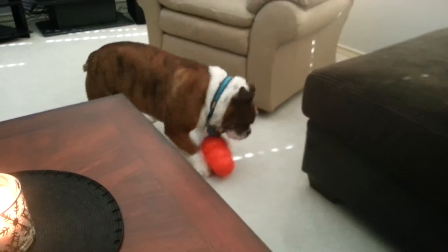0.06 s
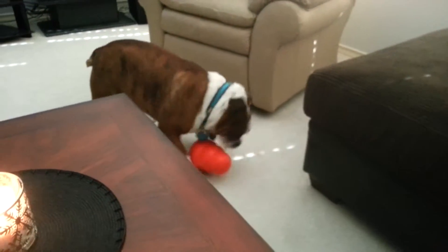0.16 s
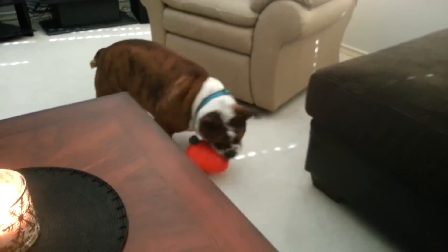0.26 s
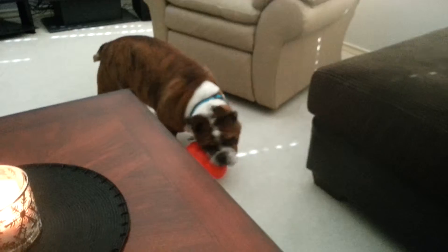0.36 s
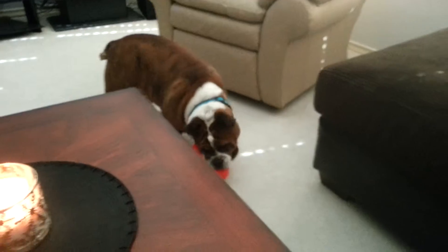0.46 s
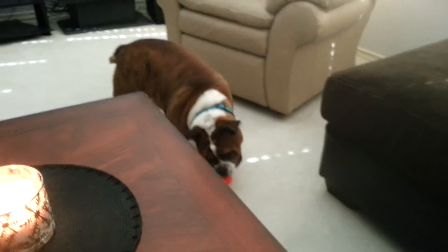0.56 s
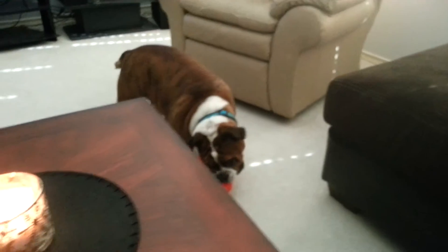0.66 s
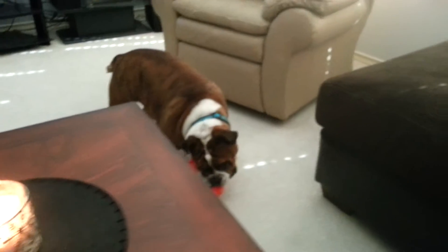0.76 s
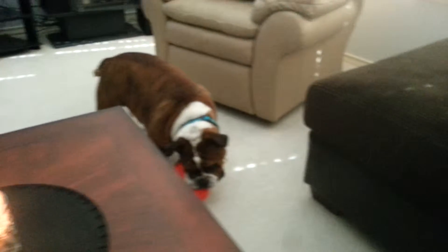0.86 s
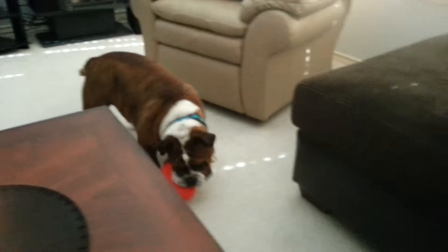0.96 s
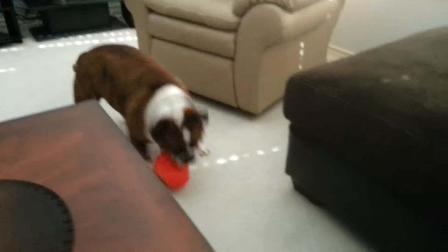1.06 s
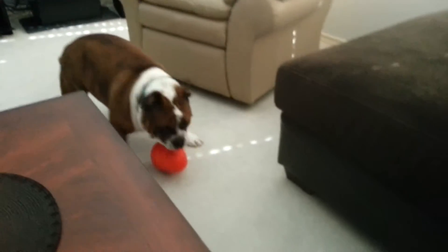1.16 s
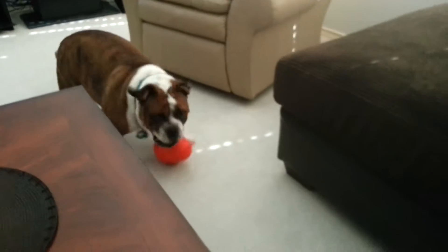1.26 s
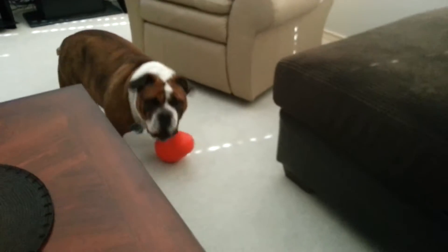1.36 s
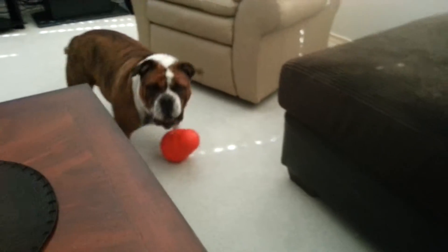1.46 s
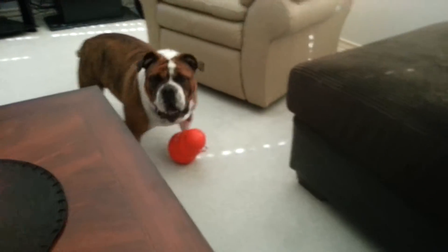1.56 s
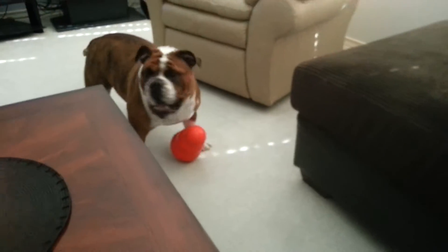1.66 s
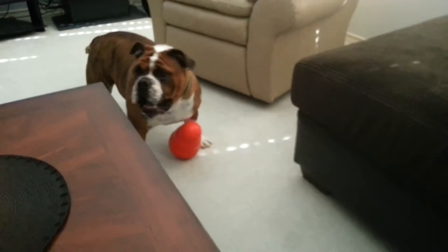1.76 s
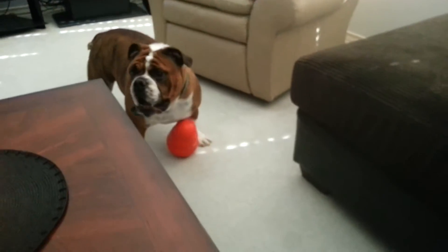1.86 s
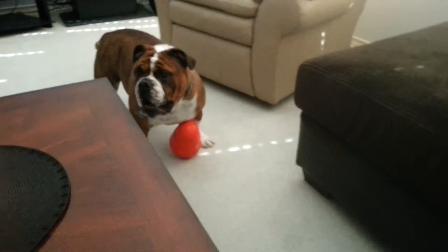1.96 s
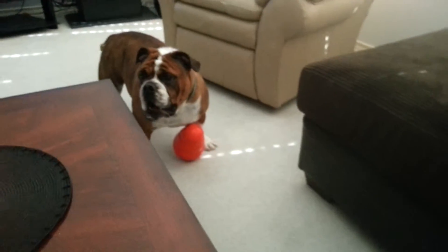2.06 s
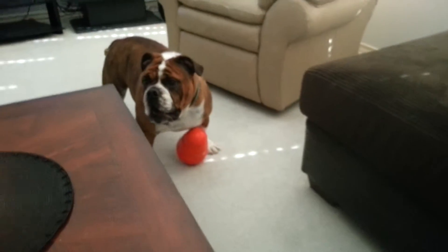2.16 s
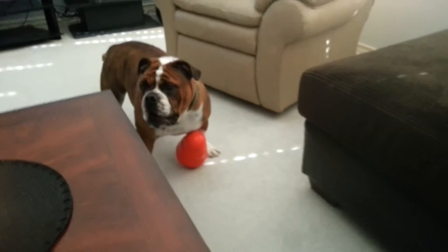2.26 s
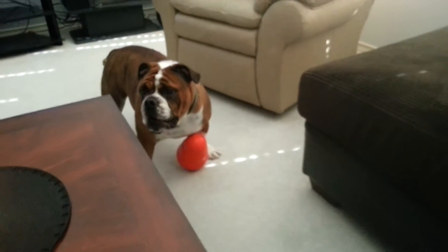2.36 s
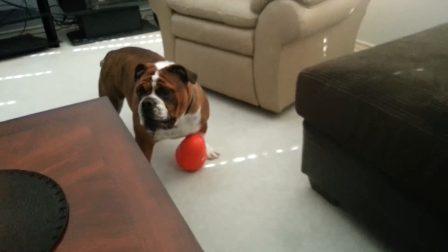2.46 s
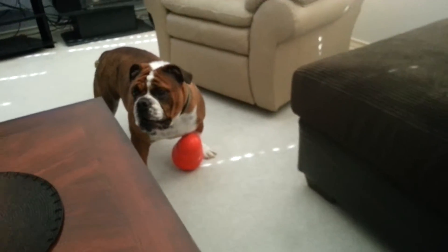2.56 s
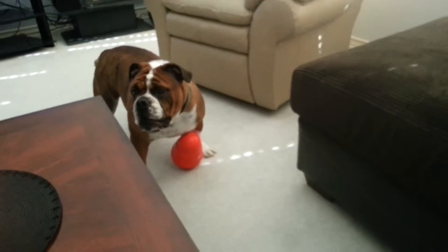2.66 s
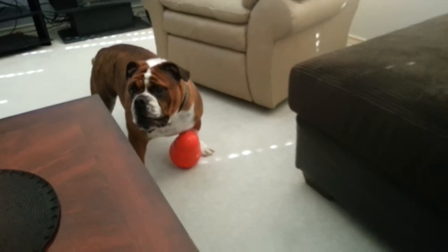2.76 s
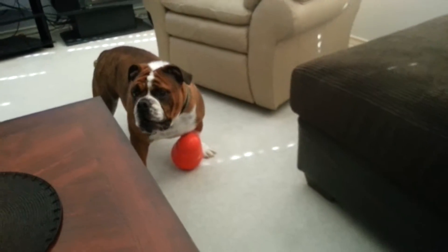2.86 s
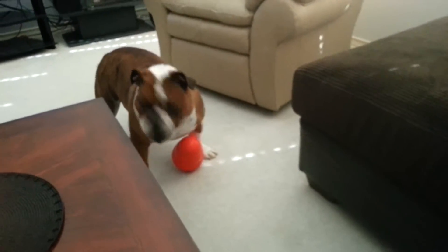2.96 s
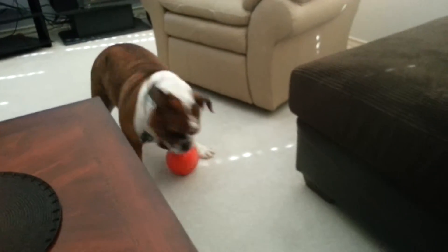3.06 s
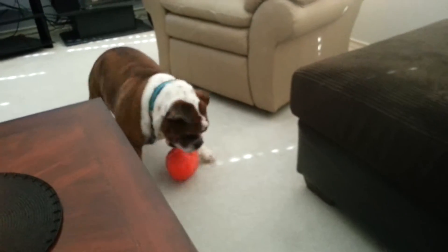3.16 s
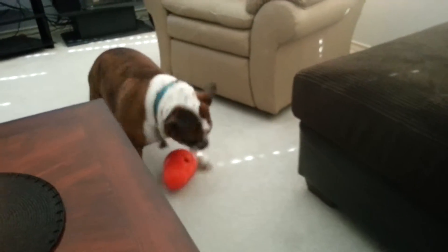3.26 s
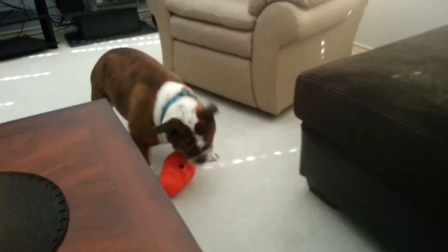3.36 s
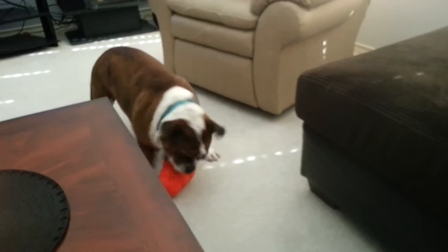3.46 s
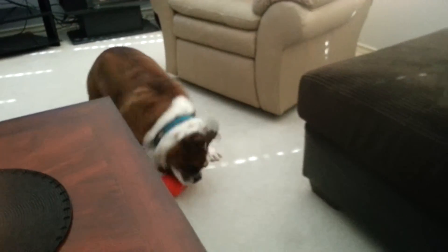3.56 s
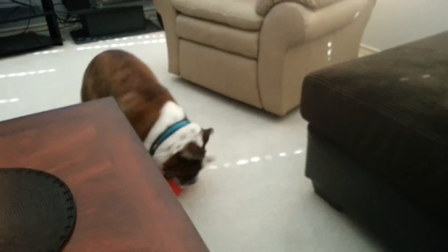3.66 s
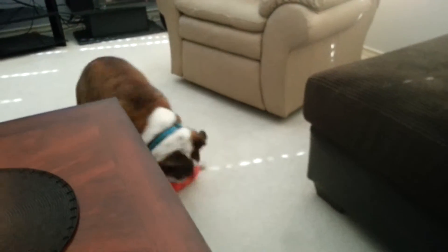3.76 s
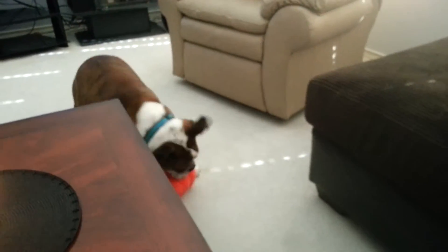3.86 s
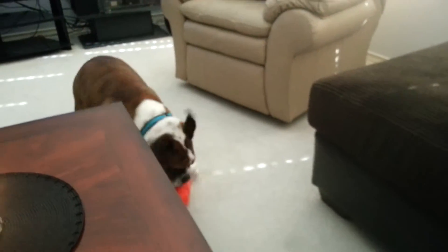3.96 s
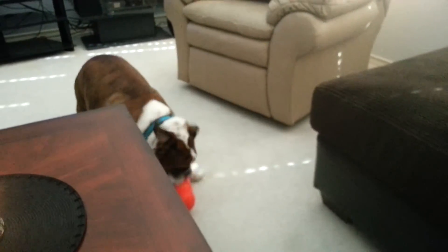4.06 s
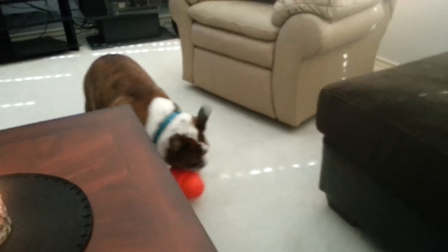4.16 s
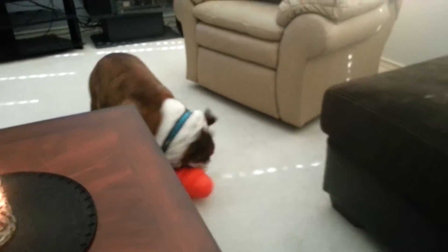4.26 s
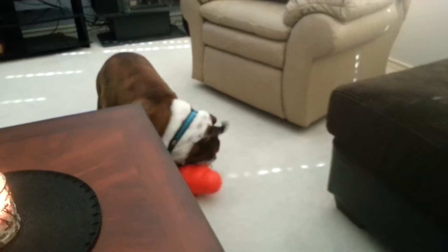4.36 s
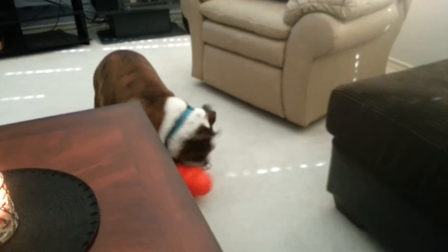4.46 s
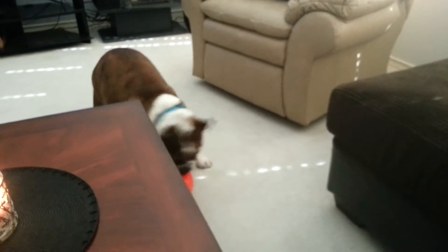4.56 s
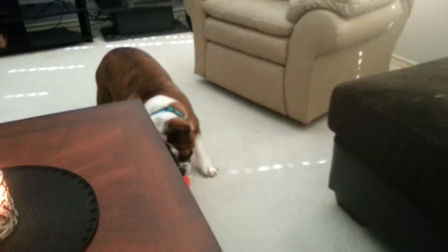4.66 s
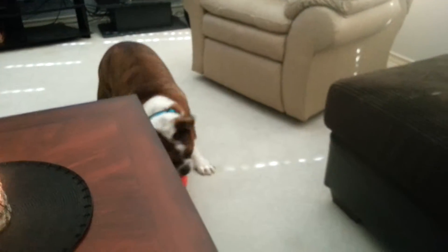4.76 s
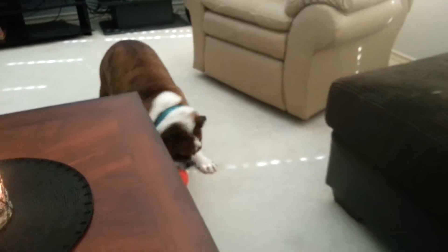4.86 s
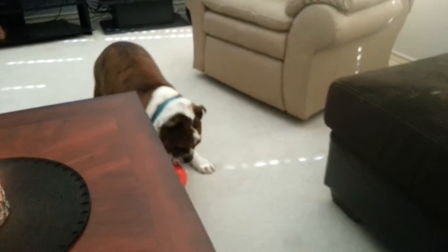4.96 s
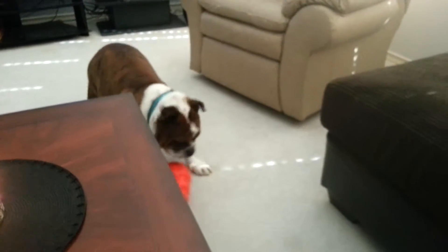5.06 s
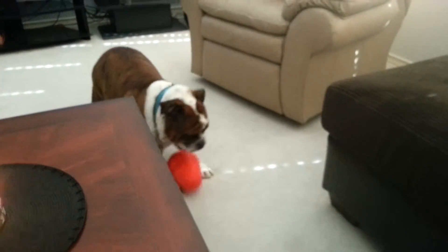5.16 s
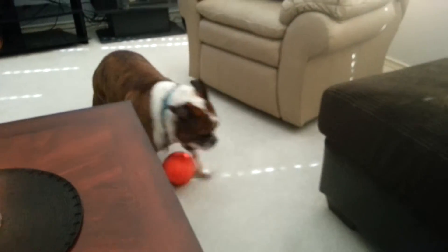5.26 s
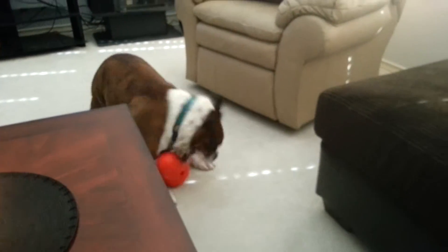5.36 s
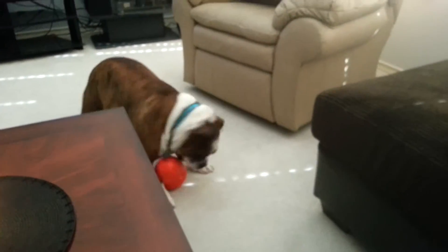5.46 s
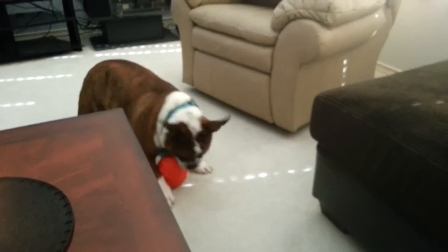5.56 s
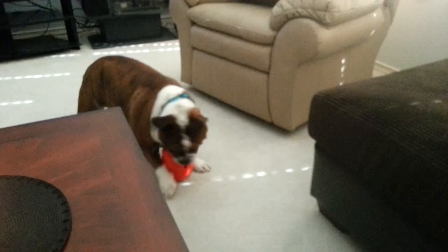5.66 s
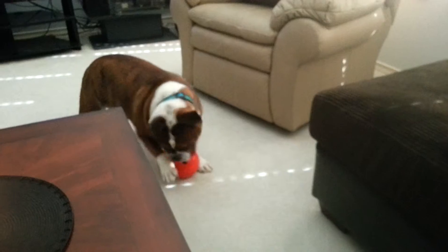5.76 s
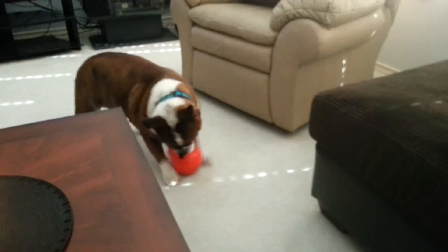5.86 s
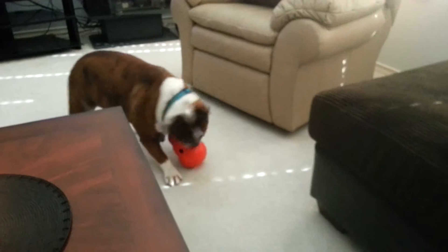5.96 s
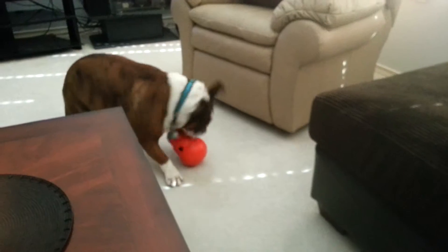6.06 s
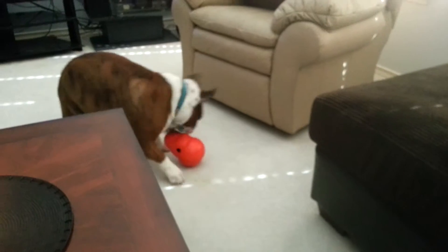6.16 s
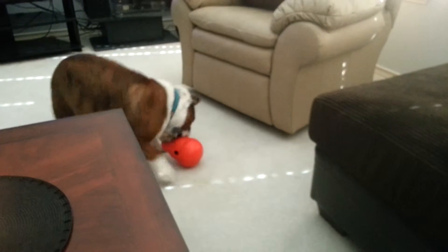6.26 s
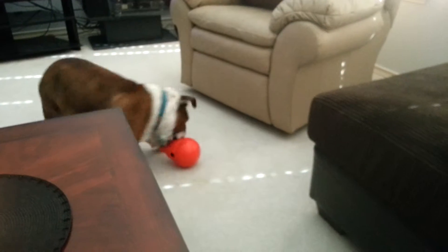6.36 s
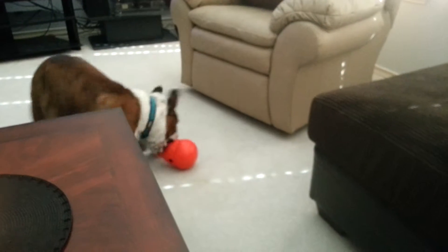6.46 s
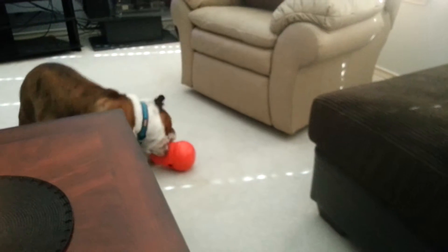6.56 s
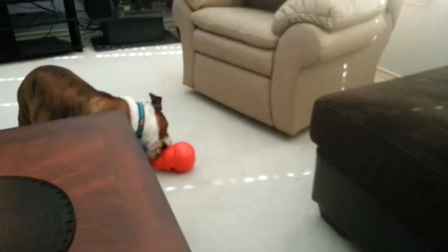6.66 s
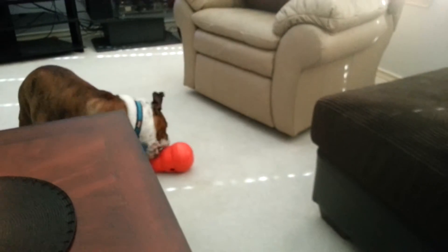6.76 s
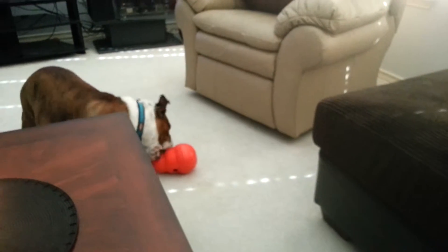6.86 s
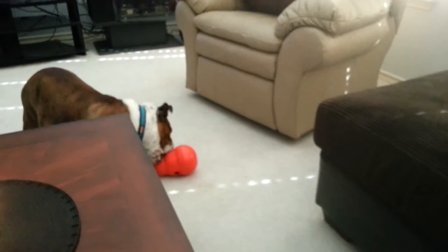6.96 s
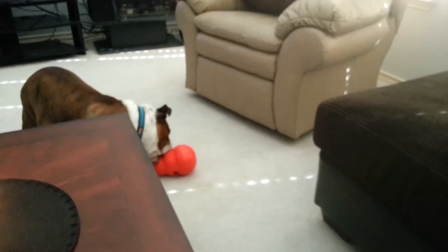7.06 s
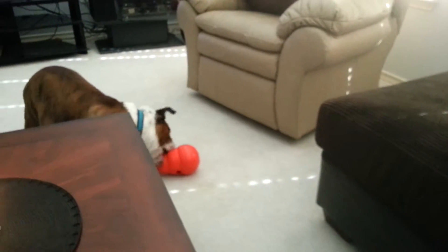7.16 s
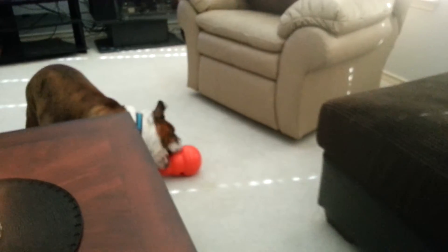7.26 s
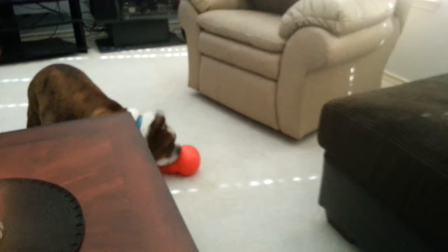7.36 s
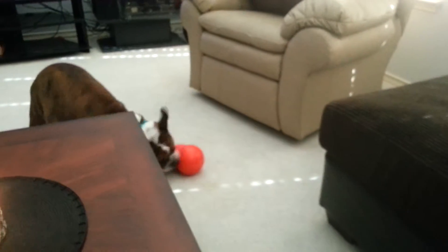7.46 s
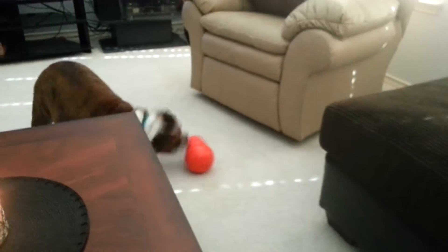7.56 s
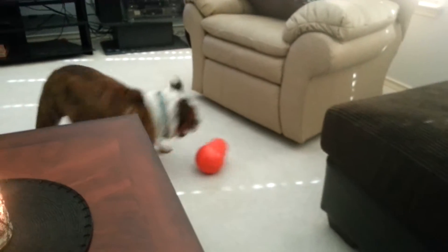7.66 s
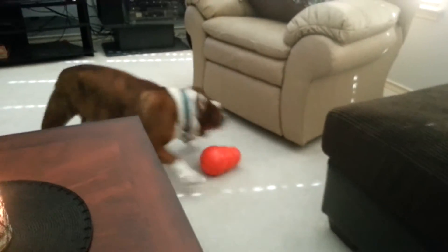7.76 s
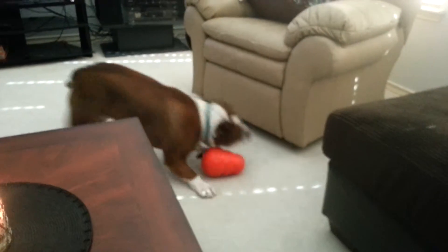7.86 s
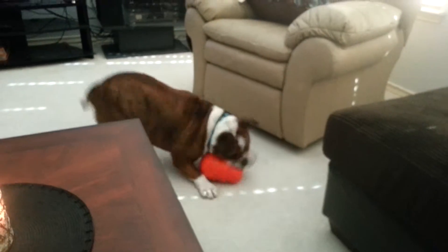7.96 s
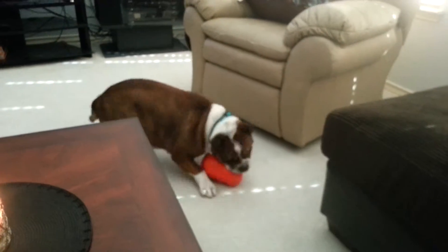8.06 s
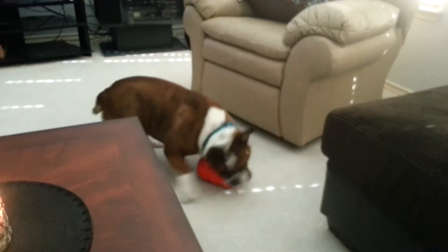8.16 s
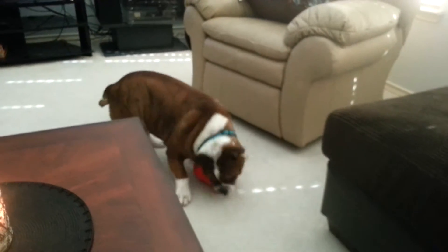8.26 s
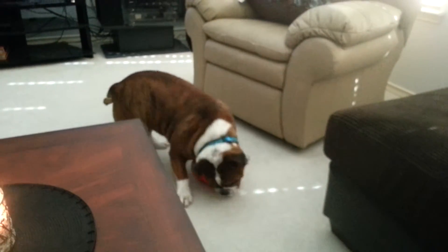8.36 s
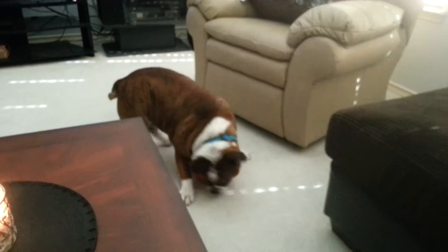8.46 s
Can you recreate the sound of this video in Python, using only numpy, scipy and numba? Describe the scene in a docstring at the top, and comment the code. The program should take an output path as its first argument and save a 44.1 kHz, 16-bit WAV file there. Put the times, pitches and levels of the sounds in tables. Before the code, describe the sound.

A quiet carpeted living room with low hum, faint hiss and a short, soft echo, heard in stereo slightly left of centre. At 0 s a bulldog gives a wet snort as its hollow rubber toy thumps and its kibble snaps sharply at 0.1; collar tags jingle until 0.6. A swelling snort with a thin whistle comes at 1.05, dull knocks at 1.3, then a strong raspy snort at 1.55. From 1.8 to 2.8 it is nearly silent. A snort and thud return at 3.0, then a harsh fluttering, clicking snort at 3.65 and a knock at 3.8. Snuffles, scuffs, soft thuds and tag tinkles continue, with a hissy sniff at 4.4, a thud and snort at 5.05, kibble clicks at 5.2 to 5.4 and snorts near 5.9. Lighter sniffing and bright tag touches fill 6.2 to 7.7. At 7.9 to 8.25 knocks, thumps and scuffs cluster, ending with a snort near 8.4.

```python
"""In a furnished living room, over a low hum and a faint hiss, a flat-nosed dog snorts and grunts
while it shoves a hollow toy that scuffs over a carpet. Breath and scuffs are noise, chopped by a flutter
and filtered by resonances; whistles are narrow noise. Kibble knocks, sharp flutter clicks, thuds and
collar tags are damped modes excited by impulses. A wall echo and a brief diffuse tail surround them."""
import sys
import numpy as np
from scipy import signal
from scipy.fft import rfft, irfft
from scipy.io import wavfile
from scipy.ndimage import uniform_filter1d
from numba import njit

SR = 44100
rng = np.random.default_rng(int(sys.argv[2]) if len(sys.argv) > 2 else 0)


def unload_audio(sound):
    """Save the sound as a 16-bit wav file, at the path given as the first command line argument."""
    columns = np.transpose(np.atleast_2d(sound))
    # keep every value between -1 and 1, then stretch to whole-number steps
    steps = np.round(np.clip(columns, -1, 1) * 32767)
    wavfile.write(sys.argv[1], SR, steps.astype(np.int16))


N = 374850

# Levels in tables are relative within their layer; a bandwidth is that of each of two filter passes.
# Spectrum of the background air: (f/Hz, relative level per Hz/dB)
AIR_SPECTRUM = [(25, -0.5), (45, -10), (60, -11), (90, -3), (98, -8.5), (138, -4), (176, -7), (213, -7),
                (473, -6.5), (515, -5), (550, -10.5), (2000, -24), (10300, -29), (13900, -21.5),
                (15500, -48)]
AIR_DB = -58.5  # mean rms level of the part common to both channels
# Faint steady tones: (start t/s, end t/s, f/Hz, relative level/dB)
FAINT_TONES = [(.4, 1.55, 410, -60.5), (1.9, 3, 511, -77)]
HUM_HZ, HUM_DB = 70, -63.5  # means of a wavering frequency and peak level

ROOM_T60_S, ROOM_TREBLE_T60_S, ROOM_BASS_SIDE = 0.21, 0.23, 0.15
WALL_S, WALL_DB = 0.01, -11  # first reflection
KNOCK_ROOM_DB, TAG_ROOM_DB = -2.5, -1.5  # sent to the walls, re the dog
# Balance as the dog moves about: (t/s, left minus right level before the spectral tilt/dB)
BALANCE = [(0.0, 5), (0.45, 3), (1.39, 3), (1.75, 7), (2.79, -5), (2.82, 3), (2.91, 2), (3.24, 5.5),
           (4.24, 3), (4.28, 2), (4.36, 3), (4.64, 2), (4.8, 4), (8.5, 3.5)]
LEFT_LAG_S, TAG_LAG_S = .00006, .00002
LEFT_TREBLE_DB, TAG_LEFT_DB = 6.5, 1  # left re right: treble rise over the bass, extra level of the tags

# Rumble of paws and toy through the floor: (t/s, relative level/dB)
FLOOR_RUMBLE = [(0.0, -61), (0.07, -40), (0.19, -39), (0.21, -67), (0.92, -79), (1.09, -47), (1.21, -74),
                (1.66, -56), (1.7, -68), (2.96, -69), (3.05, -39), (3.15, -68), (3.27, -50), (3.53, -74),
                (3.6, -47), (4.24, -57), (4.52, -45), (4.64, -75), (4.76, -45), (4.85, -71), (5.04, -59),
                (5.35, -68), (5.42, -49), (5.75, -71), (5.96, -51), (6.27, -71), (6.7, -54), (6.91, -79),
                (7.55, -57), (7.81, -75), (7.88, -36), (8.19, -69), (8.48, -45), (8.5, -64)]
RUMBLE_HZ, RUMBLE_WIDTH_HZ, RUMBLE_DB = 105.6, 51, -7.5
# Landings on the carpet: (t/s, relative peak level/dB, settled f/Hz, t60/s)
LANDINGS = [(0.045, -34, 96.5, .1), (1.059, -38, 106, 0.19), (3.011, -37, 149, .08), (3.041, -32, 102, .09),
            (3.578, -23.5, 240, 0.043), (3.806, -23.5, 255, 0.053), (3.9, -32, 167, 0.1),
            (4.14, -33.5, 185, 0.085), (4.372, -31, 265, 0.1), (4.449, -42, 95, 0.072),
            (4.745, -39, 290, 0.073), (5.041, -23, 175, 0.13), (5.618, -36, 250, 0.042),
            (6.487, -40, 254, 0.096), (6.662, -31.5, 259, 0.1), (7.297, -40, 187, 0.087),
            (7.559, -38.5, 85, 0.11), (7.866, -23, 122, 0.059), (7.884, -29, 98, 0.15),
            (7.997, -20, 208.5, 0.05), (8.031, -29, 160, 0.072), (8.04, -24.5, 330, 0.063),
            (8.209, -23, 251, 0.066), (8.241, -26, 333, 0.057), (8.386, -27, 330, .07)]
THUD_RISE, THUD_SETTLE_S = 0.2018, 0.0065  # initial excess of pitch as a share, and its time constant
THUD_SLAP_DB = -13  # slap of the shell re the body

# Kibble impacts, and sharp flutter clicks within the snort near 3.65 s:
# (t/s, shell level/dB, shell f/Hz, cavity level/dB, tick level/dB)
KNOCKS_AND_CLICKS = [(0.023, -26, 3900, -29, -42), (0.046, -18, 3800, -40, -43),
                     (0.099, -5, 4700, -30, -30), (0.109, -27, 4000, -34, -46),
                     (0.3148, -20.5, 1970, -59.5, -26.5), (0.318, -19.5, 4050, -49, -30.5),
                     (0.4493, -46, 4770, -32, -55), (0.4696, -27, 4200, -51, -50),
                     (0.5072, -28, 4830, -47, -30), (0.619, -22, 4800, -35, -38),
                     (0.7406, -28.5, 2580, -56, -66.5), (0.904, -36.5, 2140, -57, -49.5),
                     (0.984, -33, 2520, -30, -64.5), (1.0132, -23.5, 650, -28, -64.5),
                     (1.043, -27, 625, -35, -64), (1.077, -21, 1460, -40, -60),
                     (1.3075, -23, 890, -38, -57), (1.32, -33, 810, -40, -60), (1.357, -24, 900, -39, -47),
                     (3.4276, -27, 1420, -36, -59), (3.639, -14, 3230, -34, -53),
                     (3.669, -14.5, 2300, -14, -52), (3.6803, -20, 2300, -10, -50),
                     (3.7, -22, 990, -22, -54), (3.711, -12.5, 3600, -27, -56),
                     (3.8013, -15, 3300, -36, -37), (3.809, -42, 695, -17.5, -60),
                     (3.8125, -20, 2980, -40, -48), (3.9083, -39, 980, -23, -81),
                     (3.923, -42, 980, -41, -70), (4.287, -27, 4830, -35, -36), (4.748, -31, 610, -44, -60),
                     (4.8181, -36, 2760, -46.5, -58), (5.169, -12.5, 3940, -39, -49),
                     (5.172, -22, 3170, -47, -53), (5.182, -15, 4160, -43, -50),
                     (5.3452, -18, 1540, -24, -47), (5.3574, -17.5, 1200, -56, -40),
                     (5.3746, -16, 3130, -32, -25.5), (5.378, -24, 1510, -24, -36),
                     (5.573, -28, 4920, -50, -50), (5.624, -34, 580, -38, -46), (5.79, -38, 3380, -48, -34),
                     (5.968, -20, 1290, -35.5, -55), (5.9846, -17.5, 1320, -26, -48.5),
                     (5.995, -21, 1370, -35, -55), (6.206, -40, 3810, -34, -41),
                     (6.553, -47, 1800, -46, -62), (6.562, -21.5, 3130, -35, -54),
                     (7.044, -45.5, 4830, -60, -44), (7.056, -32, 4530, -60, -40),
                     (7.694, -28, 4730, -48, -30), (7.8853, -19.5, 4430, -45.5, -43),
                     (7.903, -7.5, 3180, -55, -27), (7.9135, -24, 2700, -42, -40),
                     (7.9171, -14, 3740, -20, -36), (7.9235, -7.5, 2380, -47, -37),
                     (7.936, -22, 2300, -22, -42), (8.0095, -16, 2500, -15, -53),
                     (8.0117, -15.5, 3650, -40, -55), (8.023, -19, 3000, -40, -60),
                     (8.078, -24.5, 4300, -50, -55), (8.2108, -14.5, 604, -9, -58),
                     (8.2222, -19, 700, -19, -57), (8.394, -30, 1180, -15.5, -52),
                     (8.46, -16, 2320, -22, -58.5)]
# Modes of the hollow inside the toy: (f/Hz, t60/s, relative level/dB)
CAVITY_MODES = [(590, .011, 0), (330, .02, -6)]
CRACK_DB = -6  # broad crack re the shell's tabulated level

# Touches of the tags: (t/s, top, middle and low mode level/dB, ring rattle level/dB)
TAG_TOUCHES = [(0.031, -42, -48, -33, -39.5), (0.2137, -52, -45, -41, -45), (0.2277, -23.5, -28, -26, -43),
               (0.318, -47, -54, -39, -42), (0.388, -51, -53, -42, -52), (0.471, -44, -54, -39, -50),
               (0.4924, -37, -43, -28, -48), (0.5135, -37, -48, -26, -45), (0.6096, -49, -51.5, -36, -45.5),
               (1.075, -50, -62, -57, -61), (1.1254, -46, -48, -58.5, -57), (1.3442, -24, -62.5, -62, -40),
               (1.5604, -42, -60, -60, -57), (1.982, -80.5, -84, -57, -70.5), (2.311, -71, -76, -65, -69),
               (2.513, -68, -66, -71, -66), (2.823, -59, -85, -56, -59), (3.023, -46, -60, -58, -62),
               (3.041, -45, -51, -50, -51), (3.1744, -42, -65, -54, -55), (3.4636, -45, -50, -38, -43),
               (3.765, -42, -47, -37, -42), (3.79, -40, -57, -50, -50), (3.8407, -53, -58, -53, -58),
               (3.9303, -48, -55.5, -40, -51), (3.9542, -41, -61, -58, -56), (3.99, -46, -54.5, -49, -53),
               (4.128, -51.5, -63, -49, -59.5), (4.26, -44, -64, -43, -54), (4.2892, -43, -57, -37.5, -50),
               (4.4453, -44, -62, -56, -62), (4.5185, -46, -54, -45, -50), (4.5296, -37, -61.5, -43, -47),
               (4.713, -35.5, -41.5, -52, -44.5), (4.7346, -30.5, -34, -49, -46),
               (4.8334, -57, -62, -58, -61), (5.0429, -47, -58, -56.5, -64), (5.1158, -43.5, -56, -46, -64),
               (5.3588, -37, -48, -42, -39), (5.436, -46, -56.5, -36, -58.5),
               (5.5074, -54, -65, -56, -65.5), (5.558, -58, -60, -48, -49.5),
               (5.6182, -46, -65.5, -41, -54), (5.793, -38, -51, -44, -41.5), (5.802, -45, -49, -46, -45),
               (5.9763, -41, -46, -38, -48), (6.205, -39.5, -58.5, -58, -47), (6.397, -44, -71, -49, -47.5),
               (6.4663, -43, -74, -56.5, -58), (6.563, -29, -62, -56, -50.5), (6.6832, -55, -66, -60, -61),
               (6.787, -58, -70, -60, -58), (6.9112, -63, -75, -68, -73), (7.008, -57, -69, -56, -61),
               (7.0457, -35.5, -38, -56, -47), (7.2033, -37.5, -52, -52, -49.5),
               (7.446, -45, -58, -66, -57), (7.529, -40.5, -56, -61, -53.5), (7.6946, -36, -39, -33, -43),
               (7.7887, -43, -51, -44, -57), (7.9012, -43, -41, -25, -32), (7.924, -38, -54, -43, -53),
               (8.012, -42, -55, -50, -63), (8.032, -56, -38, -50, -63.5), (8.062, -47, -57, -55, -64),
               (8.114, -46, -57, -52.5, -64.5), (8.172, -59, -59, -56, -56)]
# Modes of the tags: (f/Hz, longest t60/s, greatest offset of the twin f/Hz, full spread between touches f/Hz)
TAG_MODES = [(11735, .15, 40, 8), (6422, .24, 30, 20), (4750, .13, 220, 120)]
# Tags chattering too closely to ring clear: (t/s, relative level/dB, t60/s, f/Hz)
TAG_CHATTER = [(.035, -40, 0.33, 4750), (.33, -38, .3, 4780), (.49, -32.5, 0.33, 4730),
               (.495, -44, .2, 6460), (.5, -44, .2, 11500), (.61, -39.5, 0.29, 4800),
               (1.346, -34, 0.11, 11300), (3.463, -39.5, 0.33, 6430), (3.77, -33, 0.22, 4900),
               (4.27, -44, 0.4, 4700), (4.52, -40, 0.24, 4800), (4.715, -42, 0.38, 4700),
               (4.715, -42, .2, 6400), (5.36, -32, 0.35, 4780), (5.41, -35, 0.23, 4800),
               (5.45, -44, .15, 4800), (5.565, -44, .15, 4930), (5.628, -38, 0.21, 4860),
               (6.21, -42, 0.14, 6500), (6.4, -51.5, .3, 4770), (6.75, -49, 0.23, 4800),
               (7.046, -31.5, 0.23, 6500), (7.41, -52, 0.33, 6160), (7.696, -37, .3, 4800),
               (7.696, -32, 0.26, 6370), (7.903, -33, .3, 4800), (8.17, -44, .2, 4780)]
# Resonances of the split rings: (f/Hz, half the bandwidth/Hz, relative level/dB)
SPLIT_RINGS = [(6680, 1100, 11), (7510, 750, 9), (8550, 1550, 8.5), (4980, 780, 7.5)]
RATTLE_T60_S, RATTLE_PER_S = 0.14, 930
CHATTER_WIDTH_HZ, CHATTER_PER_S = 540, 440
TWIN_DB, TOUCH_DB = -1, 12  # twin re its mode; contact click re the tabulated rattle level
DAMPING_SPREAD = 0.72  # fur damps each touch differently: greatest cut of log t60

# Gliding whistles of breath: (start t/s, end t/s, start f/Hz, end f/Hz, level at the crest/dB)
BREATH_WHISTLES = [(0.95, 1.118, 2580, 2290, -46), (1.07, 1.164, 1653, 1710, -36),
                   (1.096, 1.133, 3010, 3000, -38), (1.289, 1.48, 2570, 2530, -51),
                   (1.703, 1.893, 2620, 2468, -55), (2.85, 2.999, 639, 794, -60),
                   (3.001, 3.08, 850, 1050, -35), (8.0, 8.2, 152, 250, -45.5), (0.918, 1.0, 594, 670, -50),
                   (1.361, 1.488, 710, 790, -44), (5.455, 5.487, 3600, 3500, -45),
                   (5.858, 5.916, 3330, 3450, -41), (1.52, 1.563, 2780, 2980, -37),
                   (1.597, 1.656, 3080, 2750, -37), (1.022, 1.09, 2040, 2080, -40),
                   (3.239, 3.365, 2300, 2260, -49.5), (3.918, 4.05, 2050, 2200, -53),
                   (4.349, 4.39, 1760, 1780, -42.5), (5.505, 5.616, 2280, 2500, -50)]
WHISTLE_WIDTH_HZ, WHISTLE_CREST = 72, 0.127  # crest as a share of the duration

# Snorts, sniffs and sudden hissy scuffs of the toy on the carpet:
# (full strength t/s, climb of the last 20 dB t/s, hold t/s, fall of 20 dB t/s,
# nose level/dB, nose f/Hz, palate f/Hz, mouth f/Hz, throat f/Hz,
# then palate, mouth, nostril hiss and throat level re nose/dB); a scuff uses the same bands
SNORTS_AND_SCUFFS = [(0.059, 0.054, 0.093, 0.14, -29.5, 1043, 1670, 3200, 242, -0.5, -2.5, -1.5, -11.5),
                     (0.319, .005, 0.042, 0.11, -47, 650, 1530, 2080, 221, -3, -1, 3.5, -8),
                     (.48, 0.04, 0.03, 0.16, -54.5, 610, 1730, 3040, 336, -9, 11.5, 15.5, -12),
                     (0.737, .005, 0.006, 0.71, -62, 600, 1550, 2650, 346, 1, -9, 12, -17),
                     (1.052, 0.1, 0.032, 0.073, -33.5, 633, 1440, 2250, 280, -5, -1.5, -4.5, -11.5),
                     (1.25, 0.14, 0.057, 0.059, -46.5, 930, 1180, 2450, 200, -10, -5.5, -22, -10),
                     (1.31, 0.024, 0.048, 0.15, -41.5, 753, 1200, 2370, 203, -29, -6, -19, -11.5),
                     (1.525, 0.0091, .01, 0.056, -36.5, 750, 1320, 2700, 201.3, -10, -8, -7.5, -18),
                     (1.563, 0.041, 0.063, 0.12, -25.5, 790, 1220, 2440, 258, -5, -6.5, -7, -20.5),
                     (1.75, .05, 0.0092, 0.094, -59, 685, 1260, 2360, 252, -6, 0, -11, 1),
                     (2.9, 0.096, .02, 0.087, -58.5, 666, 1328, 2400, 210, -17, -8, -17, -19.5),
                     (2.965, 0.029, 0.024, 0.042, -39, 720, 1328, 2430, 170, -11, -16, -15, -29),
                     (3.015, 0.05, 0.046, 0.088, -33, 1005, 2120, 2780, 161.6, -9.5, -6, -3.5, -8),
                     (3.275, 0.077, 0.02, 0.043, -38, 844, 1490, 2120, 186, -8.5, -8, -5, -14),
                     (3.365, 0.067, 0.035, 0.14, -47.5, 885, 1410, 2430, 173.7, -3, -3, -9, -16.5),
                     (3.427, 0.0092, 0.024, 0.076, -45.5, 910, 1350, 2140, 230, 4, 5.5, 7, -8.5),
                     (3.6, 0.051, 0.024, 0.048, -36, 710, 1550, 3160, 246, 0, -4, 3, -1.5),
                     (3.653, 0.04, 0.008, 0.027, -25, 660, 1900, 3000, 285.7, -4.5, 1, -4, -7),
                     (3.682, 0.041, 0.013, 0.084, -26.5, 870, 1780, 2750, 320, -3.5, -0.5, -1, -3),
                     (3.808, 0.0093, 0.0051, 0.083, -50, 630, 1664, 3030, 237, -9.5, 7, 17, 12.5),
                     (3.929, 0.092, 0.0029, 0.33, -45, 1020, 1460, 2020, 183, -3.5, -1, 2.5, -10),
                     (4.085, 0.02, 0.012, 0.051, -51.5, 656, 1490, 2030, 200, 2.5, 5, 4, -3),
                     (4.14, 0.073, 0.019, 0.063, -50.5, 945, 1500, 1880, 227, -2, 2, -7, 4),
                     (4.389, 0.041, 0.15, 0.051, -36.5, 690, 1700, 3300, 260, -11, -8.5, -0.5, -5.5),
                     (4.64, 0.027, 0.04, 0.036, -49.5, 990, 1400, 2327, 244, -3, -3.5, -3, -6.5),
                     (4.739, 0.028, 0.0049, 0.14, -49, 643, 1270, 2680, 274, -5, 0, 4.5, -1),
                     (5.055, 0.066, 0.054, 0.23, -35.5, 800, 1150, 2560, 242, -0.5, -9, 2, -2),
                     (5.173, 0.0085, 0.008, 0.075, -39, 920, 1210, 3720, 243, -16, -1, 5.5, -3),
                     (5.347, 0.0098, 0.025, 0.16, -41, 870, 1510, 2370, 230, 1.5, 1, 9, -5.5),
                     (5.51, 0.084, 0.0054, 0.46, -70.5, 779, 1510, 2330, 233, -7, 15, 17, -3),
                     (5.62, 0.25, 0.0715, 0.14, -55, 710, 1380, 2160, 256, 0, 2.5, 2.5, 2.5),
                     (5.884, 0.1, 0.059, 0.14, -35, 1025, 1380, 3470, 226, 0.5, -4, -1.5, -8.5),
                     (5.975, 0.058, 0.052, 0.079, -37.5, 960, 1200, 3900, 233, 4, 1, 1.5, -2),
                     (6.2, 0.033, 0.16, 0.31, -55, 760, 1580, 2230, 274, -3, 1, -2, -3.5),
                     (6.485, 0.043, 0.017, 0.03, -47, 894, 1310, 2600, 247, -23, -8.5, -9, -3.5),
                     (6.567, 0.006, 0.0047, 0.086, -58.5, 739, 1430, 2830, 267, 8, 19, 18, -5),
                     (6.666, 0.17, 0.037, 0.092, -41.5, 745, 1800, 2800, 268, -5, -1.5, -1.5, -4.5),
                     (6.87, 0.12, .005, 0.1, -57, 650, 1350, 2270, 246, -9.5, -16.5, -20, -1),
                     (7.152, 0.12, 0.0047, 0.026, -53.5, 650, 1500, 2150, 237, -10, 0.5, 1, -13),
                     (7.309, 0.098, 0.0048, 0.082, -42.5, 595, 1870, 2950, 226, -1, -0.5, 0.5, -3),
                     (7.43, 0.29, 0.0133, 0.18, -52, 750, 1367, 2630, 203, -12, -12, -2, 3.5),
                     (7.55, 0.064, 0.017, 0.046, -61, 637, 1420, 2810, 147, -9, -10, -11, 8),
                     (7.63, 0.033, 0.0043, 0.15, -49, 570, 1190, 2640, 203, -2.5, -9, 1, 2.5),
                     (7.7, 0.0065, 0.0038, 0.074, -52.5, 814, 1720, 2530, 193, -1, 3, 17.5, 5.5),
                     (7.873, 0.021, 0.016, 0.056, -59.5, 630, 1490, 2710, 147, 2, -5, 12, 20),
                     (7.917, 0.025, 0.008, 0.028, -33, 790, 1520, 2640, 133, 0, -2, 8.5, -14),
                     (8.007, 0.029, 0.00245, 0.16, -37, 770, 1550, 2520, 218, -21, -2, 1, 2.5),
                     (8.104, 0.0088, 0.023, 0.043, -42.5, 755, 1320, 2640, 227, -13, -14, -6, -13),
                     (8.149, 0.014, 0.012, 0.027, -35.5, 716, 1326, 2640, 227, -21, -20, -5, -20),
                     (8.211, 0.0037, 0.0033, 0.028, -33.5, 640, 1540, 2730, 258, -8, -12, -5.5, -4),
                     (8.392, 0.049, .12, 0.11, -33.5, 670, 1250, 2500, 307, -5, -14, -4.5, -3.5)]
# Quiet snuffling between the snorts: (t/s, nose level/dB)
SNUFFLE_LEVEL = [(0, -49.5), (.3, -55.5), (.55, -63.5), (.7, -66), (.9, -64.5), (1.2, -56), (1.6, -72),
                 (2.1, -82.5), (2.8, -96.5), (3.15, -56.5), (3.4, -58.5), (3.53, -62.5), (3.85, -58),
                 (4.25, -59), (4.95, -58.5), (5.3, -67), (5.78, -66), (6.4, -61.5), (6.8, -68), (7, -68.5),
                 (7.5, -65), (7.8, -63), (8.3, -55), (8.5, -64)]
# Its colour: (nose, palate, mouth, throat f/Hz; palate, mouth, hiss, throat level re nose/dB)
SNUFFLE_TIMBRE = (669, 1446, 2578, 239, -10.5, -10.5, 2.5, 2)
# Hiss of the nostrils and scuffs: (f/Hz, half the bandwidth/Hz, relative level/dB)
HISS_BANDS = [(3550, 840, -24.5), (3470, 2250, 27.5), (4394, 1050, 25.5), (6520, 2030, 18.5)]
ATTACK_CURVE, RELEASE_CURVE = 1.6, 0.75  # exponents; over 1 rounds the top of a swell
SNUFFLE_FLICKER_DB, SNUFFLE_FLICKER_PER_S = 2.5, 14
NOSE_WIDTH_HZ, PALATE_WIDTH_HZ, MOUTH_WIDTH_HZ, THROAT_WIDTH_HZ = 334, 450, 660, 227
HOLLOW_HZ, HOLLOW_WIDTH_HZ, HOLLOW_DB = 637, 62, -10  # strong breath sounds the hollow of the toy
WANDER, WANDER_PER_S = 0.083, 16  # the resonances drift by this rms share as the muzzle moves
FLUTTER_HZ = 121.24  # centre of an uneven rate
FLUTTER_QUIET, FLUTTER_LOUD = 0.42, 0.64  # share 0-1 of the breath that the palate chops
LOUD_DB = -33  # nose level from which the breath counts as loud
CRACKLE, CRACKLE_PER_S = 0.51, 120  # pops: amplitude re the breath, mean rate
TOP_HZ = 15800


def undb(db):
    """Level is logarithmic: amplitude gain of a level in dB."""
    return 10 ** (np.asarray(db) / 20)


def unit(x):
    """Normalisation of signal power: rms 1."""
    return x / np.sqrt(np.mean(x ** 2))


def decay(t, t60):
    """Exponential damping, falling 60 dB in t60 seconds."""
    return np.exp(-np.log(1000) * t / t60)


@njit
def svf(x, hz, width):
    """Second-order resonance: state-variable band-pass with a movable centre, where its gain is 1."""
    y, band, low = np.empty(len(x)), 0., 0.
    for i in range(len(x)):
        g, k = np.tan(np.pi * hz[i] / SR), width / hz[i]
        v = (band + g * (x[i] - low)) / (1 + g * (g + k))
        band, low, y[i] = 2 * v - band, low + 2 * g * v, k * v
    return y


def steep(x, hz, width_hz):
    """Cascaded resonance: two equal passes steepen the skirts; rms 1."""
    hz = hz * np.ones(len(x))
    width = float(width_hz)
    return unit(svf(svf(x, hz, width), hz, width))


def through(x, modes):
    """Superposition of fixed resonances, rms 1."""
    return unit(sum(undb(db) * steep(x, hz, 2.0 * half_width) for hz, half_width, db in modes))


def sparse(shape, rate):
    """Poisson-like impulses: randomly timed, of random size, at a mean rate per second."""
    return (rng.random(shape) < rate / SR) * rng.standard_normal(shape)


def walk(rate):
    """Slow random modulation: levels held 1 / rate s, smoothed twice; rms 1."""
    k = max(int(SR / rate), 1)
    held = np.repeat(rng.standard_normal(N // k + 1), k)
    return unit(uniform_filter1d(uniform_filter1d(held, k), k)[:N])


def ring(hz, t60):
    """Damped free vibration of one mode, starting amplitude 1."""
    t = np.arange(int(t60 * SR)) / SR
    return np.sin(2 * np.pi * hz * t) * decay(t, t60)


def band(x, order, low_hz, high_hz):
    """Band limitation by a Butterworth filter."""
    return signal.lfilter(*signal.butter(order, [low_hz, high_hz], "band", fs=SR), x)


def add(out, s, sound):
    """Linear superposition of a sound from s seconds."""
    i = int(s * SR)
    out[i:i + len(sound)] += sound[:len(out) - i]


def air():
    """Spectrally shaped noise: low rumble largely common to both channels, hiss less correlated."""
    hz = np.maximum(np.fft.rfftfreq(N, 1 / SR), 1)
    table_hz, table_db = np.array(AIR_SPECTRUM).T
    colour = undb(np.interp(np.log(hz), np.log(table_hz), table_db))
    mid, side = rfft(rng.standard_normal((2, N))) * colour
    side = side * np.clip(hz / 1200, .35, 1)
    mid, side = irfft(mid, N), irfft(side, N)
    return np.array([mid + side, mid - side]) * undb(AIR_DB + 1.2 * walk(3)) / np.std(mid)


def hum():
    """Modulated sinusoids: a wavering low hum and faint tones that come and go."""
    t = np.arange(N) / SR
    phase = 2 * np.pi * np.cumsum(HUM_HZ + .6 * walk(3)) / SR
    out = undb(HUM_DB + 1.5 * walk(4)) * np.sin(phase)
    for start, end, hz, db in FAINT_TONES:
        fade = np.interp(t, [start, start + .15, end - .1, end], [0, 1, 1, 0])
        out += undb(db + 3 + 1.5 * walk(8)) * fade * np.sin(2 * np.pi * hz * t)
    return out


def room(x):
    """Reverberation: first reflection, then a diffuse tail, mostly common in bass and wide in treble."""
    t = np.arange(SR // 2) / SR
    mid, side = rng.standard_normal((2, len(t)))
    bass_noise = [mid + ROOM_BASS_SIDE * side, mid - ROOM_BASS_SIDE * side]
    low = signal.lfilter(*signal.butter(1, 700, fs=SR), bass_noise)
    high = signal.lfilter(*signal.butter(1, 500, "high", fs=SR), [mid + 1.06 * side, mid - 1.28 * side])
    tail = 1.3 * low * decay(t, ROOM_T60_S) + high * decay(t, ROOM_TREBLE_T60_S)
    tail = tail * np.clip(t / WALL_S, .1, 1) ** 4
    tail = tail / np.sqrt(np.sum(tail ** 2) / 2)
    # the right channel receives the reflection six samples after the left
    tail[[0, 1], int(WALL_S * SR) + np.array([0, 6])] += undb(WALL_DB)
    return signal.fftconvolve(x[None], tail, axes=1)[:, :N]


def ports(x, lag_s):
    """Interchannel time and level differences: the left port hears slightly later and brighter."""
    hz = np.fft.rfftfreq(N, 1 / SR)
    treble = hz ** 2 / (hz ** 2 + 1500.0 ** 2)
    tilt = undb(LEFT_TREBLE_DB / 2 * treble - 2.5) * np.exp(-1j * np.pi * hz * lag_s)
    pan_db = np.interp(np.arange(N) / SR, *np.array(BALANCE).T) / 2
    return irfft(rfft(x) * np.array([tilt, 1 / tilt]), N) * undb([pan_db, -pan_db])


def thuds():
    """Impact on a soft base: toy and paws sound low modes of falling pitch; the floor rumbles as noise."""
    out = np.zeros(N)
    for s, db, hz, t60 in LANDINGS:
        t = np.arange(int(t60 * SR)) / SR
        turns = hz * (t + THUD_RISE * THUD_SETTLE_S * (1 - np.exp(-t / THUD_SETTLE_S)))
        body = np.sin(2 * np.pi * turns) * decay(t, t60)
        add(out, s, undb(db) * body * np.minimum(t / 0.0071, 1))
        add(out, s, undb(db + THUD_SLAP_DB) * ring(3.1 * hz, 0.0085))
    level_db = np.interp(np.arange(N) / SR, *np.array(FLOOR_RUMBLE).T) + RUMBLE_DB + 2.1 * walk(30)
    return out + undb(level_db) * steep(rng.standard_normal(N), RUMBLE_HZ, RUMBLE_WIDTH_HZ)


def knocks_and_clicks():
    """Impulsive excitation: kibble ticks, rings shell and cavity; flutter clicks use the same short modes."""
    out, grit = np.zeros(N), rng.standard_normal((len(KNOCKS_AND_CLICKS), 256))
    fade = np.exp(-np.arange(256) / SR / .0006)
    for (s, shell_db, shell_hz, cavity_db, tick_db), noise in zip(KNOCKS_AND_CLICKS, grit):
        shell = ring(shell_hz, .0015 + 4 / shell_hz)
        # the excitation builds up over one cycle
        onset = np.minimum(np.arange(len(shell)) * shell_hz / SR, 1)
        add(out, s, undb(shell_db + 11.5) * shell * onset)
        add(out, s, undb(tick_db + 17.5) * band(noise * fade, 2, 4500, 12000))
        add(out, s, undb(shell_db + CRACK_DB) * band(noise[::-1] * fade, 1, 600, 6000))
        for hz, t60, db in CAVITY_MODES:
            add(out, s, undb(cavity_db + db - 7.0) * ring(hz, t60))
    return out


def tags():
    """Beating of near-equal modes: metal tags click, ring in twin pairs and bounce twice; rings rattle."""
    out, shake = np.zeros(N), np.zeros(N)
    chance = rng.random((len(TAG_TOUCHES), 4, 3))
    t = np.arange(SR // 4) / SR
    bursts = rng.standard_normal((len(TAG_TOUCHES), 256)) * np.exp(-t[:256] / .0007)
    clicks = band(bursts, 2, 5000, 12500)
    rattle_shape = decay(t, RATTLE_T60_S) * np.minimum(t / 0.0084, 1)
    for (s, *mode_db, rattle_db), (detune, wait, size, damp), click in zip(TAG_TOUCHES, chance, clicks):
        add(out, s, undb(rattle_db + TOUCH_DB) * click)
        add(shake, s, undb(rattle_db + 7.5) * rattle_shape)
        for (hz, longest_t60, twin_hz, shift_hz), db, d, fur in zip(TAG_MODES, mode_db, detune, damp):
            t60 = longest_t60 * np.exp(-DAMPING_SPREAD * fur)
            mode = ring(hz - shift_hz * (d - .5), t60)
            twin = ring(hz + 2 * twin_hz * (d - .5), t60)  # on the neighbouring tag
            sound = undb(db - 1.5) * (mode + undb(TWIN_DB) * twin)
            sound *= np.minimum(np.arange(len(sound)) / SR / 0.001, 1)
            add(out, s, sound)
            for bounce in range(2):
                add(out, s + 0.013 + 0.059 * wait[bounce], 0.084 * size[bounce] * sound)
    # a minute offset keeps the filters from an all-zero input
    ticks = sparse(N, RATTLE_PER_S) + 1e-18
    touches = sparse((len(TAG_CHATTER), len(t)), CHATTER_PER_S) + 1e-18
    for (s, db, t60, hz), touch in zip(TAG_CHATTER, touches):
        shape = decay(t, t60) * np.minimum(t / 0.0094, 1)
        add(out, s, undb(db) * shape * steep(touch, hz, CHATTER_WIDTH_HZ))
    return out + shake * through(ticks, SPLIT_RINGS)


def whistles():
    """Narrow-band turbulence, in the nostrils or low in the throat, that glides, swells and fades."""
    out = np.zeros(N)
    for start, end, hz0, hz1, db in BREATH_WHISTLES:
        u = np.arange(int((end - start) * SR)) / SR / (end - start)
        tone = steep(rng.standard_normal(len(u)), hz0 + (hz1 - hz0) * u, WHISTLE_WIDTH_HZ)
        swell = np.interp(u, [0, WHISTLE_CREST, 1], [0, 1, 0])
        add(out, start, undb(db) * swell * tone)
    return out


def envelopes():
    """Addition of powers: snorts and scuffs sum in power; resonances take the power-weighted mean."""
    t = np.arange(0, N / SR + .002, .001)
    flicker_db = SNUFFLE_FLICKER_DB * np.interp(t, np.arange(N) / SR, walk(SNUFFLE_FLICKER_PER_S))
    rows = np.array(SNORTS_AND_SCUFFS)
    s, rise, hold, fall, peak_db = rows[:, :5, None].transpose(1, 0, 2)
    attack_db = 20 * np.maximum((s - t) / rise, 0) ** ATTACK_CURVE
    release_db = 20 * np.maximum((t - s - hold) / fall, 0) ** RELEASE_CURVE
    snuffle_db = np.interp(t, *np.array(SNUFFLE_LEVEL).T) + flicker_db
    power = undb(np.vstack([peak_db - attack_db - release_db, snuffle_db])) ** 2
    colour = np.vstack([rows[:, 5:], SNUFFLE_TIMBRE]).T
    nose = power.sum(axis=0)
    hz = colour[:4] @ power / nose
    gain = np.sqrt(np.vstack([nose, undb(colour[4:]) ** 2 @ power]))
    return [np.interp(np.arange(N) / SR, t, curve) for curve in (*hz, *gain)]


def snorts_and_scuffs():
    """Source and filter: palate-chopped turbulence excites the airway; scuffs share its noise and bands."""
    *centres, nose, palate, mouth, hiss, throat = envelopes()
    nose_hz, palate_hz, mouth_hz, throat_hz = (hz * np.exp(WANDER * walk(WANDER_PER_S)) for hz in centres)
    # the palate flaps unevenly; each slap lets out a puff that decays over the cycle
    phase = np.cumsum(FLUTTER_HZ * np.exp(.3 * walk(25))) / SR % 1
    puffs = unit(np.exp(-phase / 0.7) * undb(9.5 * np.tanh(walk(90))))
    loudness = np.minimum(nose / undb(LOUD_DB), 1)
    flutter = np.clip(FLUTTER_QUIET + (FLUTTER_LOUD - FLUTTER_QUIET) * loudness, 0, 1)
    breath = rng.standard_normal((2, N)) * (1 - flutter + flutter * puffs)
    # wet nostrils crackle
    pops = CRACKLE * unit(sparse((2, N), CRACKLE_PER_S))
    flow, jet = (breath + pops) / np.hypot(1, CRACKLE)
    layers = nose * steep(flow, nose_hz, NOSE_WIDTH_HZ)
    layers += palate * steep(flow, palate_hz, PALATE_WIDTH_HZ)
    hollow = nose * np.sqrt(loudness) * undb(HOLLOW_DB)
    layers += hollow * steep(flow, HOLLOW_HZ, HOLLOW_WIDTH_HZ)
    layers += mouth * steep(flow, mouth_hz, MOUTH_WIDTH_HZ)
    layers += throat * steep(flow, throat_hz, THROAT_WIDTH_HZ)
    return layers + hiss * through(jet, HISS_BANDS)


def scene():
    """Superposition of direct sound, reverberation and background."""
    background = air() + hum()
    impacts, collar, noises = thuds() + knocks_and_clicks(), tags(), whistles() + snorts_and_scuffs()
    # tags and toy sound drier than the dog
    walls = room(noises + undb(KNOCK_ROOM_DB) * impacts + undb(TAG_ROOM_DB) * collar)
    # the tags hang on the left
    tag_balance = undb([[TAG_LEFT_DB / 2], [-TAG_LEFT_DB / 2]])
    direct = ports(noises + impacts, LEFT_LAG_S) + ports(collar, TAG_LAG_S) * tag_balance
    return background + walls + direct


def record(dry):
    """Band limitation: deep bass is weak, loud peaks are soft, little sounds above about 14-16 kHz."""
    low_cut = signal.sosfilt(signal.butter(3, 55, "high", fs=SR, output="sos"), dry)
    softened = .8 * np.tanh(low_cut / .8)
    droop = signal.sosfilt(signal.butter(4, 13800, fs=SR, output="sos"), softened)
    return signal.sosfilt(signal.ellip(10, .2, 80, TOP_HZ, fs=SR, output="sos"), droop)


dry = scene()
out = record(dry)
unload_audio(out)
```